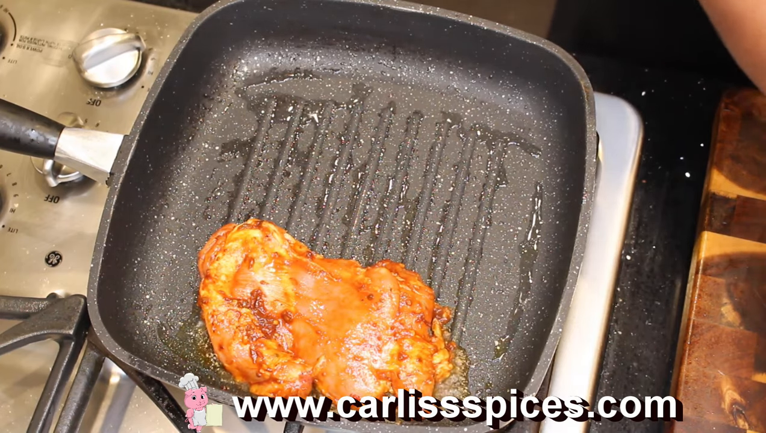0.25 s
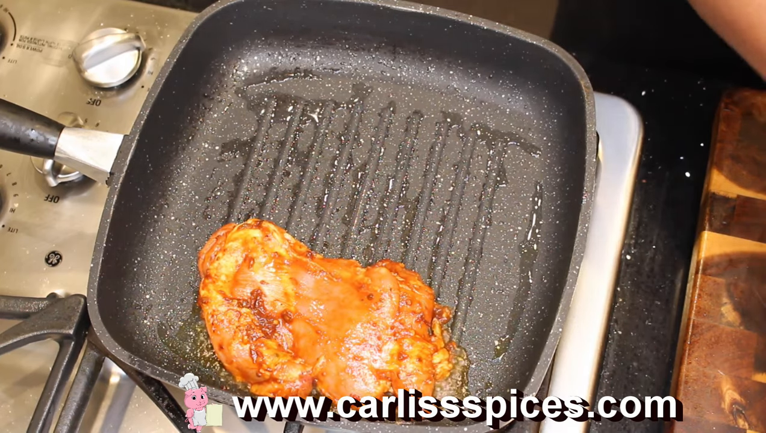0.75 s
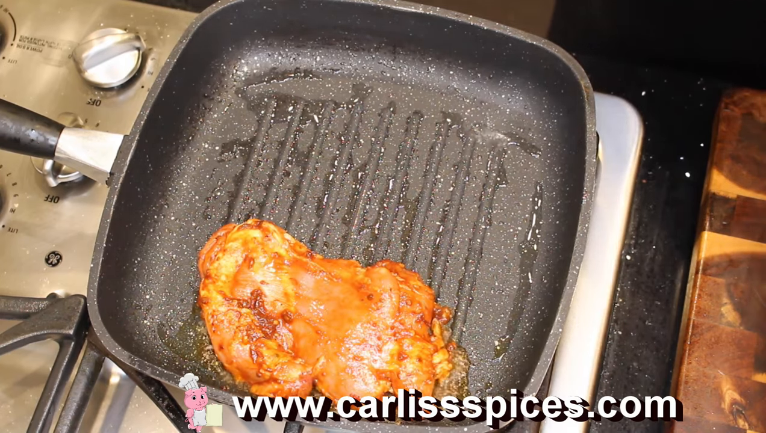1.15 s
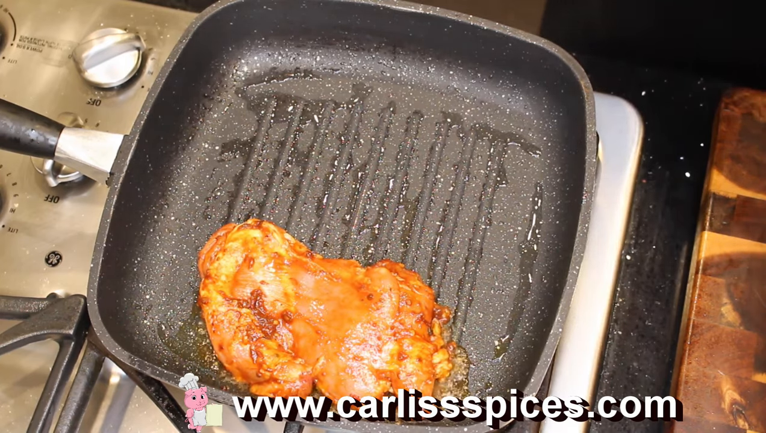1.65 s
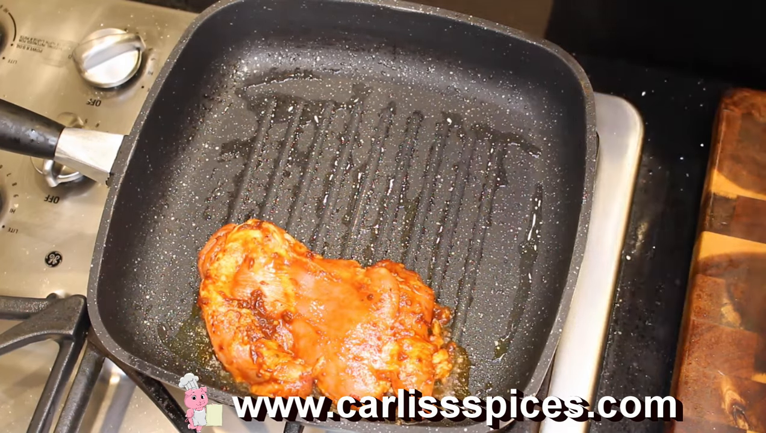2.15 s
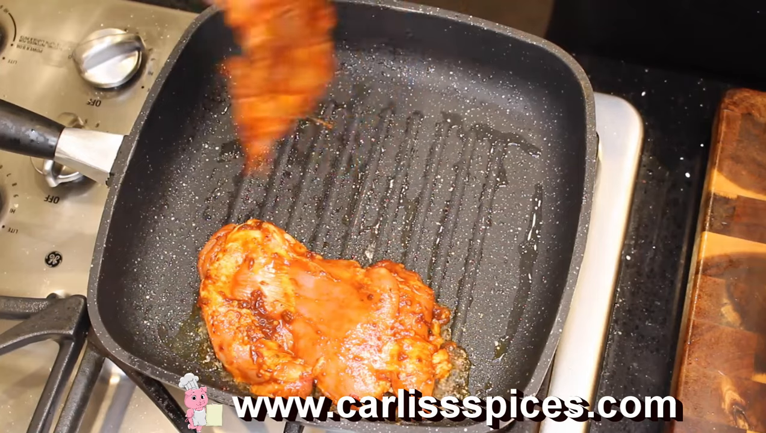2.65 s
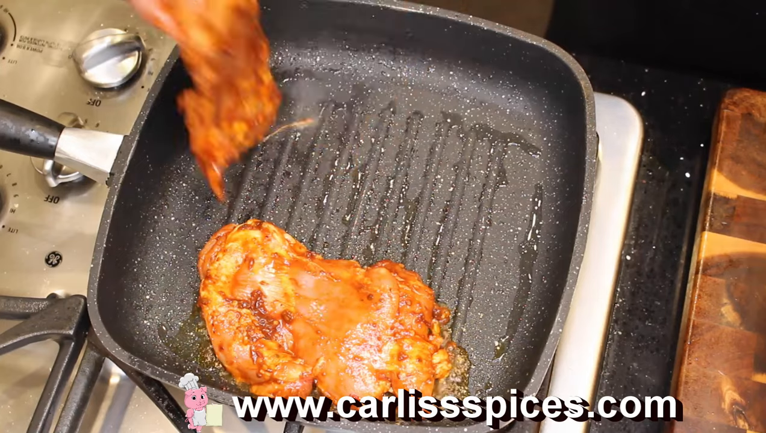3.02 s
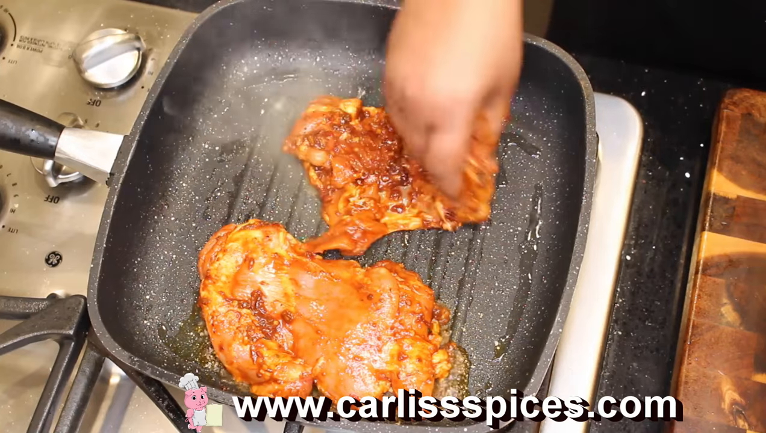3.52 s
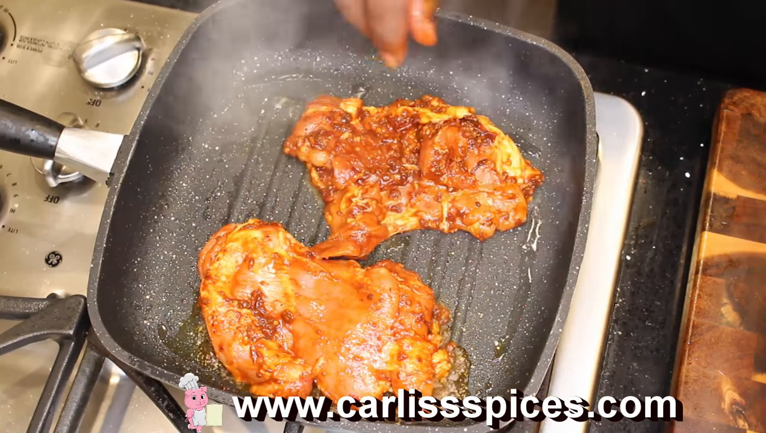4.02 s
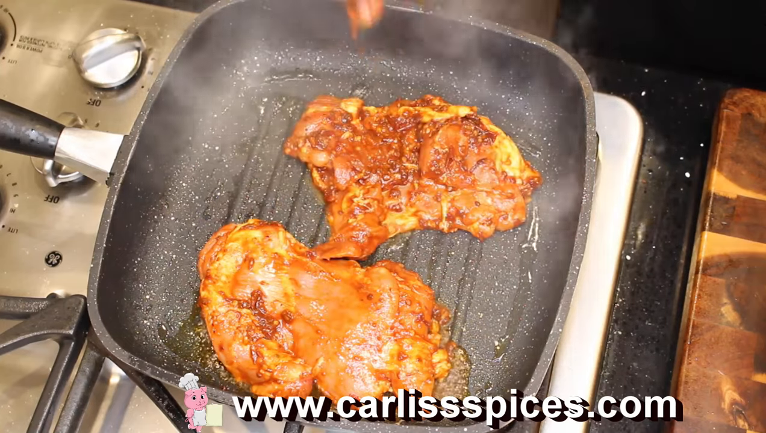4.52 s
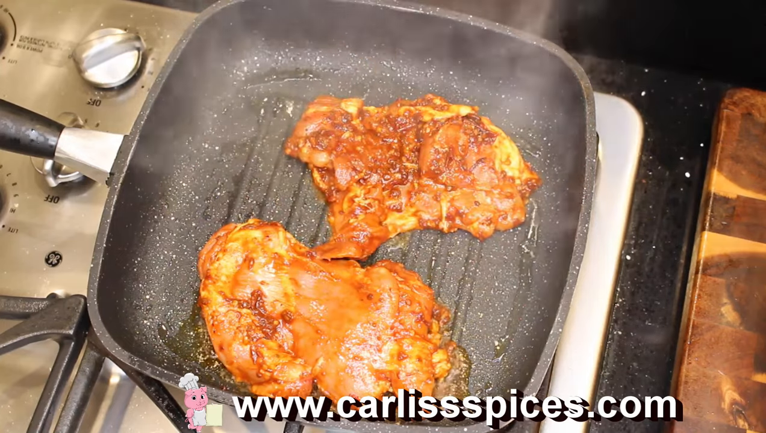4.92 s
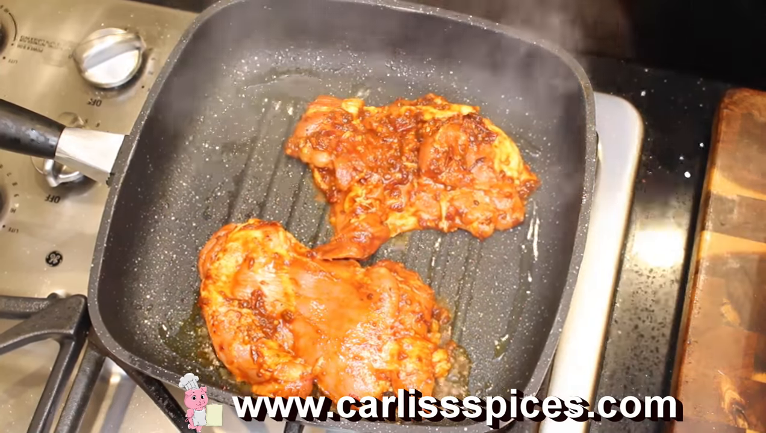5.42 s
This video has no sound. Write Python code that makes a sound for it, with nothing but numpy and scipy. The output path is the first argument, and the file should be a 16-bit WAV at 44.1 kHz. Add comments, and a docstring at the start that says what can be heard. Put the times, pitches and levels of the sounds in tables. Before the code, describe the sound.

Steady crackling hiss of meat frying close up, scattered loud fat snaps, then a short steam rush and slightly brighter sizzle over faint kitchen rumble.

```python
"""Kitchen, stereo: marinated chicken fries in an oiled grill pan on a gas stove, above a low rumble.
Thousands of steam bubbles burst in the oil each second: random clicks and noise, coloured by the pan; thin
tones flicker in the hiss. Early on a few big bubbles start to pop, as cracks with decaying rings, and faint
low sine tones come and go. At about 3 s a second piece is laid in: the sizzle turns brighter, a rush of steam
noise swells and dies, and the rumble sinks. The recorder's gain ducks at loud moments and recovers."""
import sys
import numpy as np
from scipy import signal
from scipy.fft import rfft, irfft, next_fast_len
from scipy.io import wavfile

SR = 44100
rng = np.random.default_rng(int(sys.argv[2]) if len(sys.argv) > 2 else 0)


def pcm_store(signal):
    """Save signal as 16-bit PCM."""
    levels = np.round(np.clip(np.atleast_2d(signal), -1, 1) * 32767)
    wavfile.write(sys.argv[1], SR, levels.astype(np.int16).T)


N = 250037   # samples, 5.67 s
TIME_S = np.arange(N) / SR
PAD = next_fast_len(N)   # transform length
HZ = np.maximum(np.arange(PAD // 2 + 1) * SR / PAD, 1)   # frequency grid


def amp(db):
    """dB to gain."""
    return 10 ** (np.asarray(db) / 20)


def rms_one(x):
    """Scale to rms 1."""
    return x / np.sqrt(np.mean(x ** 2) + 1e-20)


def in_time(points):
    """A (time, value) table as one value a sample."""
    seconds, value = np.transpose(points)
    return np.interp(TIME_S, seconds, value)


def at_hz(points):
    """A (frequency, value) table on the frequency grid, straight lines over log frequency."""
    hz, value = np.transpose(points)
    return np.interp(np.log(HZ), np.log(np.maximum(hz, 1)), value)


def drift(rate_hz):
    """Slow chance: noise at every 40th sample, low-passed twice at rate_hz; rms 1."""
    pole = np.exp(-2 * np.pi * rate_hz * 40 / SR)
    noise = rng.standard_normal(N // 40 + 2002)
    slow = signal.lfilter([1], [1, -2 * pole, pole * pole], noise)[2000:]   # start-up dropped
    return np.interp(np.arange(N) / 40, np.arange(len(slow)), rms_one(slow))


def stereo(mid_side, colour_db):
    """Left and right spectra from mid and side streams, coloured, with pan rings, stereo width and lean."""
    # faint resonances of the pan and its oil: (frequency [Hz], width [Hz], lift [dB])
    pan_resonances = [(241, 12, 3.5), (270, 25, 5.5), (355, 15, 4), (453, 16.5, 8), (586, 14, 9),
                      (742, 21, 5), (906, 10, 8), (1120, 14, 2.5), (1192, 21, -8), (1317, 47, -7),
                      (1337, 16, 6.5), (2315, 99, 1), (3360, 32, 1), (3640, 20, 4), (4330, 22, 4)]
    # stereo width: (frequency [Hz], side minus mid [dB])
    width_points = [(60, -5), (180, -8), (550, -11), (1650, -10.5), (4970, -6.5), (15000, -4)]
    # balance at the microphones: (frequency [Hz], left minus right [dB])
    lean_points = [(60, 2), (240, -2.5), (950, -1.5), (3770, -1.0), (15000, -1.5)]
    for hz, width_hz, lift_db in pan_resonances:
        colour_db = colour_db + lift_db / (1 + (2 * (HZ - hz) / width_hz) ** 2)
    mid, side = rfft(mid_side, PAD) * amp(colour_db)
    side = side * amp(at_hz(width_points))
    sign = np.array([[1], [-1]])   # left, right
    return (mid + sign * side) * amp(sign * at_hz(lean_points) / 2)


def bursts(per_s, spread_db, clump_db):
    """Bubble bursts: random clicks, many small and few large, thicker and thinner in level; rms 1."""
    sizes = amp(spread_db * np.minimum(rng.exponential(1, (2, N)), 4))
    signs = rng.choice([-1, 1], (2, N))
    born = rng.random((2, N)) < per_s / SR
    return rms_one(sizes * signs * born * amp(clump_db * drift(14.0)))


def ringing(per_s, length_s, spread_db, glide):
    """Thin tones flicker up briefly in the hiss, at any pitch from 500 to 15500 Hz, sliding a little; rms 1."""
    born, length, pitch, slide, level = rng.random((5, round(per_s * N / SR), 1))
    samples = np.arange(2600)
    lasts = length_s * (0.37 + 0.74 * length)
    progress = samples / SR / lasts
    hz = (500 + 15000 * pitch) * (1 + glide * (slide - .5) * progress)
    shape = np.sin(np.pi * np.minimum(progress, 1)) ** 2
    tones = amp(spread_db * level) * shape * np.sin(2 * np.pi * np.cumsum(hz, axis=1) / SR)
    at = (born * N).astype(int) + samples
    return rms_one(np.bincount(at.ravel(), tones.ravel(), N)[:N])


def sizzle():
    """Crackle over a blur of countless tiny bursts, thin tones in the hiss; third octaves flicker partly alone."""
    # vigour of the frying: (time [s], level [dB])
    vigour = [(0, -21.5), (.6, -20), (1.15, -20.5), (1.4, -22), (1.62, -21), (2.05, -22), (2.3, -20.5),
              (2.6, -21), (2.85, -20), (3.05, -21), (3.22, -19.5), (3.35, -21), (4.2, -21), (4.6, -22),
              (5.05, -20.5), (5.25, -22), (5.67, -22.5)]
    # colour of the sizzle: (frequency [Hz], relative density [dB per Hz])
    sizzle_colour = [(280, -53), (480, -13), (516, -20), (588, -10), (651, -8.5), (910, -7), (1220, -5.5),
                     (1730, -0.5), (2280, 1.5), (2670, -3.5), (3320, 1.5), (3730, -3), (4920, -1),
                     (8550, -5), (15500, -16.5)]
    # colour change once the second piece spits: (frequency [Hz], change [dB])
    spit_colour = [(450, 0), (1200, -0.3), (2500, -0.5), (3400, -0.1), (5000, 0.1), (7000, 0.8),
                   (11000, 2.6), (15500, 2.6)]
    landing_s, spit_rise_s, spit_waver = 3.05, .18, 0.16   # waver is a share of the colour change
    # the wet face of the second piece starts to spit
    spitting = np.clip((TIME_S - landing_s) / spit_rise_s, 0, 1) + spit_waver * drift(3.0)

    crackle = bursts(per_s=4000, spread_db=3.5, clump_db=0.84)
    tones = ringing(per_s=560, length_s=.055, spread_db=4.0, glide=.006)
    tones = np.array([tones, tones[::-1]])   # the side stream is the mid stream reversed in time
    blur = rng.standard_normal((2, N))
    both = stereo(amp(-2.5) * crackle + amp(-8.5) * tones + blur, at_hz(sizzle_colour))
    both = both / np.sqrt(np.mean(irfft(both.mean(0), PAD) ** 2))   # mean of left and right at rms 1

    out = 0
    shared_flickers = [drift(13.0), drift(15)]   # blocks of three bands take turns
    change_db = at_hz(spit_colour)
    for k in range(17):
        place = 3 * np.log2(HZ / 400) - k   # third octaves from the band's centre
        share = np.cos(np.pi / 2 * np.clip(place, -1, 1)) ** 2   # neighbouring bands add up to one
        flicker_db = 0.4 * shared_flickers[k // 3 % 2] + 0.85 * drift(15.0)
        band_db = spitting * change_db[share.argmax()] + flicker_db
        out = out + irfft(both * share, PAD)[:, :N] * amp(band_db)
    return out * amp(in_time(vigour))


def rumble():
    """Burner and room air: dull noise that swells a little, with a mains line in it."""
    # kitchen rumble, lower once the second piece is in, with a brief dip: (time [s], level [dB])
    rumble_level = [(0, -44.5), (1.1, -46), (1.2, -47.5), (1.6, -46.5), (2.8, -46), (3.4, -52), (3.47, -63),
                    (3.56, -53.5), (4.25, -50), (5.4, -51.5), (5.67, -50.5)]
    # colour of the rumble: (frequency [Hz], relative density [dB per Hz])
    rumble_colour = [(15, -41), (36, -4), (75, -9), (102, 1), (188, 0.5), (243, 2), (351, 1.5), (409, 1.5),
                     (464, -13), (520, -14.5), (680, -30), (1140, -120)]
    mains_hz, mains_db = 60, -14.5   # sine peak against the rms of the noise
    both = stereo(rng.standard_normal((2, N)), at_hz(rumble_colour))
    both = rms_one(irfft(both, PAD)[:, :N])
    mains = amp(mains_db) * np.sin(2 * np.pi * mains_hz * TIME_S)
    return (both + mains) * amp(in_time(rumble_level) + 1.9 * drift(6))


def pops():
    """Big bubbles: a millisecond of ragged crack, a ring at the bubble's pitch and in the pan, a weak splash."""
    # big bubbles bursting: (time [s], peak level [dB], pitch [Hz], left minus right [dB])
    big_bubbles = [(0.0926, -13, 3020, -3), (1.1742, 2.5, 1960, 5), (1.188, -6, 3290, -.5),
                   (1.6312, -5, 4500, 2), (1.9567, -9, 2350, -1), (2.3131, -9.5, 2170, -1),
                   (2.39, -20, 7500, -1.5), (2.5410, -7, 4660, -.5), (2.893, -6, 3360, -1),
                   (3.2087, -6, 3520, -1), (4.8424, -18, 7290, -1.5), (5.3197, -7, 8200, -1.5),
                   (5.5102, -9, 5490, -1)]
    # pan ringing under a pop: (frequency [Hz], relative level [dB], decay by 60 dB [s])
    pan_rings = [(2140, -0.5, 0.0084), (3260, -0.5, 0.013), (4140, 5, 0.0069), (8840, 7, 0.0063)]
    length = 2000   # samples
    out, t = np.zeros((2, N + length)), np.arange(length) / SR
    low_cut = signal.butter(4, 1000, "high", fs=SR, output="sos")
    top_cut = signal.butter(2, 9500, fs=SR, output="sos")
    tearing = np.exp(-np.maximum(t - .0008, 0) / .0004)   # the skin tears for a moment, then stops
    splash = amp(-9.5) * np.exp(-t / 0.006)
    pan = np.array([amp(db - 60 * t / t60) * np.sin(2 * np.pi * hz * t) for hz, db, t60 in pan_rings])
    for time_s, peak_db, hz, left_right_db in big_bubbles:
        ragged = rng.choice([-1, 1], length)
        crack = signal.sosfilt(top_cut, ragged * (tearing + splash))
        ring = np.sin(2 * np.pi * hz * t) * np.exp(-t / 0.0015)
        strength = amp(1.8 * rng.standard_normal(len(pan_rings)))   # each pop strikes the pan differently
        pop = signal.sosfilt(low_cut, amp(4.0) * crack + ring + amp(-1.5) * strength @ pan)
        side_db = np.array([[.5], [-.5]]) * left_right_db
        i = round(time_s * SR)
        out[:, i:i + length] += amp(peak_db + side_db) * pop / np.abs(pop).max()
    return out[:, :N]


def hums():
    """Faint low tones: soft-edged sines that come and go, wavering in level and pitch."""
    # tones: (start [s], length [s], frequency [Hz], level [dB])
    low_tones = [(.1, 0.99, 101, -49), (0.108, 0.13, 539, -39.5), (0.24, 0.23, 274, -46),
                 (0.904, 0.22, 140, -49), (1.723, 0.083, 352, -36.5), (3.392, 0.45, 610, -42),
                 (4.702, 0.67, 115.8, -56)]
    out = np.zeros(N)
    clock = np.cumsum(1 + 0.0052 * drift(10.5)) / SR   # uneven time makes the pitch waver
    for start_s, length_s, hz, level_db in low_tones:
        shape = np.sin(np.pi * np.clip((TIME_S - start_s) / length_s, 0, 1)) ** .5
        out += amp(level_db) * shape * np.sin(2 * np.pi * hz * clock)
    return out * amp(2.0 * drift(9.2))


def rush():
    """Steam rushing out under the second piece: smooth bright noise with a fast flutter swells, holds, dies."""
    # colour of the steam: (frequency [Hz], relative density [dB per Hz])
    steam_colour = [(1500, -32), (3000, 5), (4500, 12.5), (6000, -3), (8700, 7), (12000, -5), (15500, -20)]
    start_s, rise_s, hold_s, fall_db_s, level_db = 3.15, 0.12, 0.16, 90, -22.5   # fall in dB per second
    t = TIME_S - start_s
    swell = np.clip(t / rise_s, 0, 1) ** 2
    fall = amp(-fall_db_s * np.maximum(t - rise_s - hold_s, 0))
    both = irfft(stereo(rng.standard_normal((2, N)), at_hz(steam_colour)), PAD)[:, :N]
    return rms_one(both) * swell * fall * amp(level_db + 1.4 * drift(25))


def scene():
    """Pan, kitchen, pops, low tones and steam at the microphones."""
    return sizzle() + rumble() + pops() + hums() + rush()


def record(dry):
    """The recorder's gain control ducks at loud moments and recovers; peaks clip; the top is cut."""
    duck_from_db, duck_share, release_db_s = -16.5, 0.48, 54   # share of the excess taken off; dB per second
    lag_s, cutoff_hz = 0.037, 15680
    power = signal.lfilter([.01], [1, -.99], np.mean(dry ** 2, axis=0))   # smoothed over about 2 ms
    over_db = np.maximum(10 * np.log10(power + 1e-12) - duck_from_db, 0)
    # jumps up at once, then falls back at the release rate
    released_db = release_db_s * TIME_S
    held_db = np.maximum.accumulate(duck_share * over_db + released_db) - released_db
    lag = np.exp(-1 / (lag_s * SR))   # the gain follows some milliseconds late
    duck_db = signal.lfilter([1 - lag], [1, -lag], held_db)
    clipped = np.clip(dry * amp(-duck_db), -1, 1)
    top_cut = signal.ellip(12, .3, 80, cutoff_hz, fs=SR, output="sos")
    return signal.sosfilt(top_cut, clipped)


dry = scene()
out = record(dry)
pcm_store(out)
```